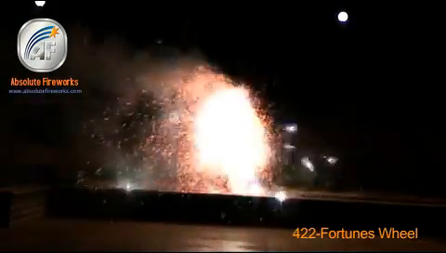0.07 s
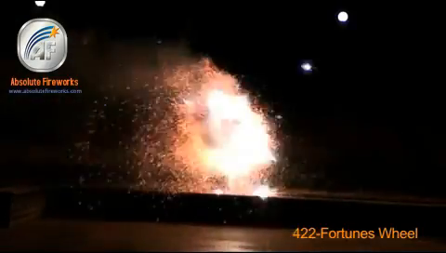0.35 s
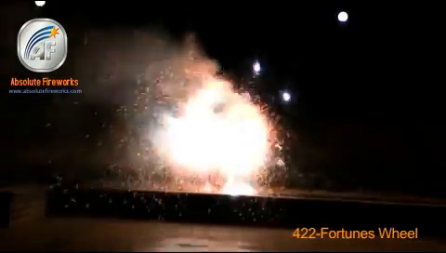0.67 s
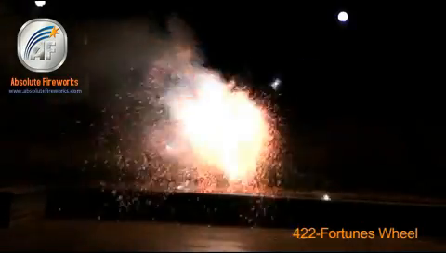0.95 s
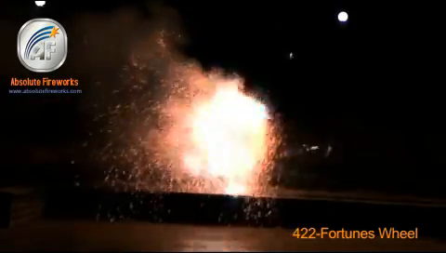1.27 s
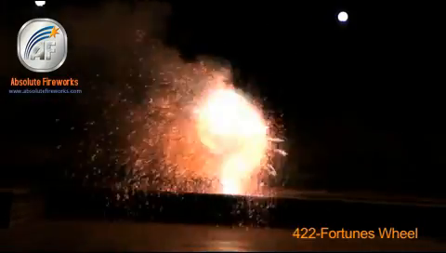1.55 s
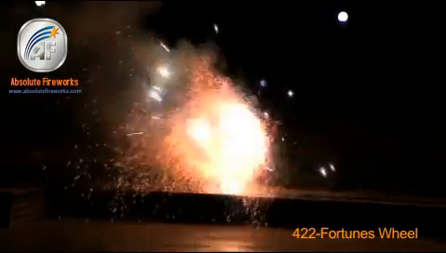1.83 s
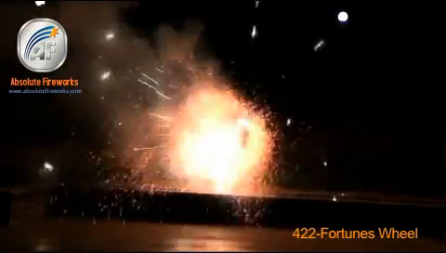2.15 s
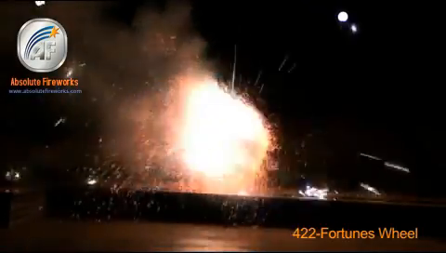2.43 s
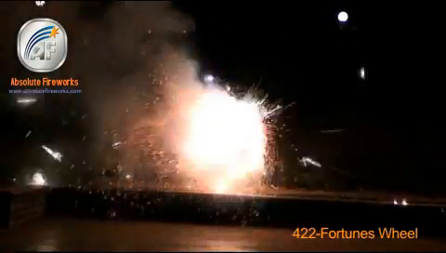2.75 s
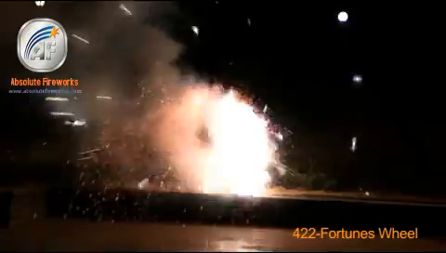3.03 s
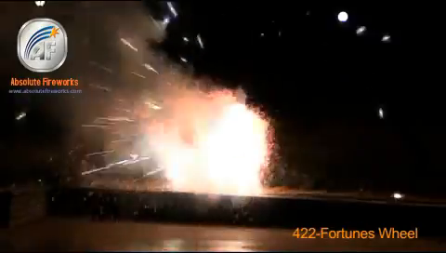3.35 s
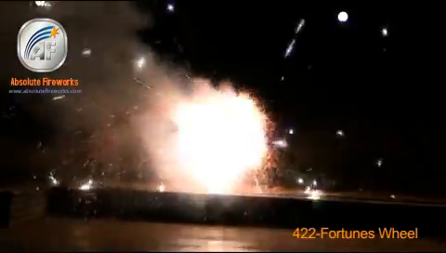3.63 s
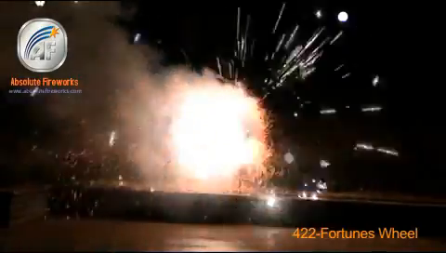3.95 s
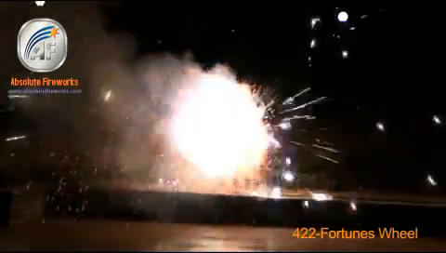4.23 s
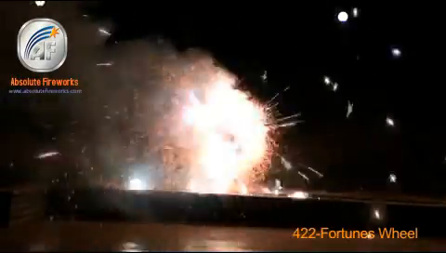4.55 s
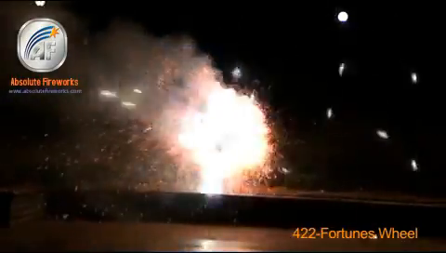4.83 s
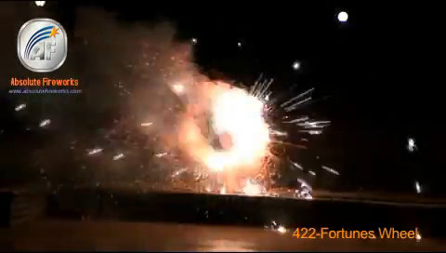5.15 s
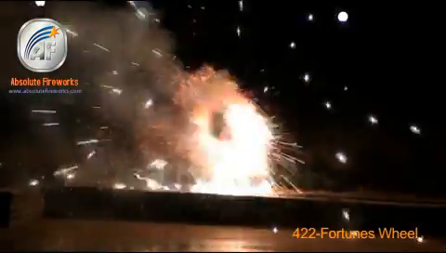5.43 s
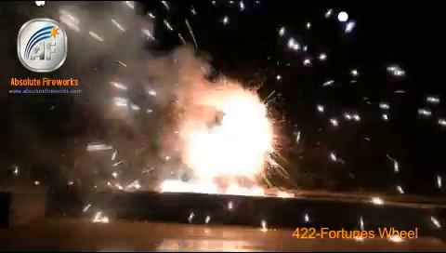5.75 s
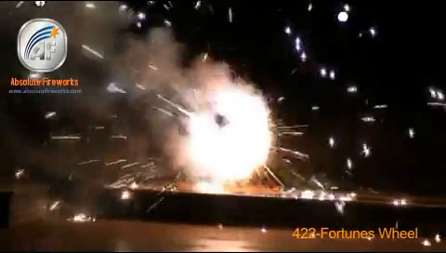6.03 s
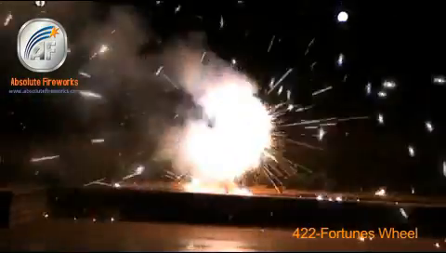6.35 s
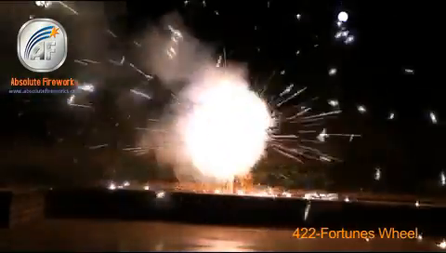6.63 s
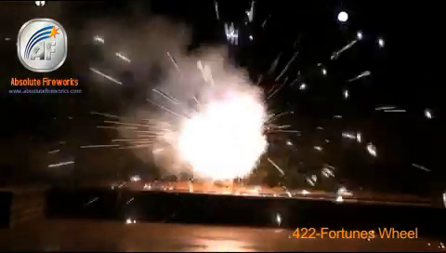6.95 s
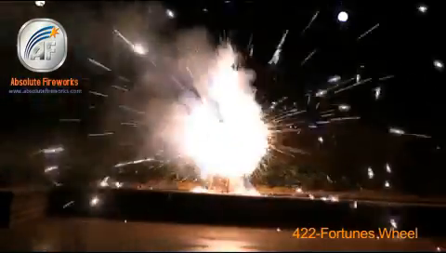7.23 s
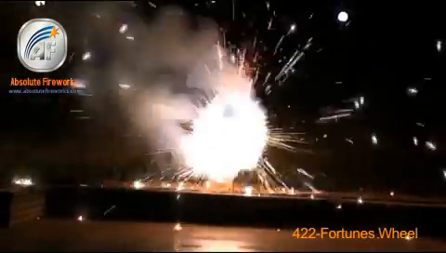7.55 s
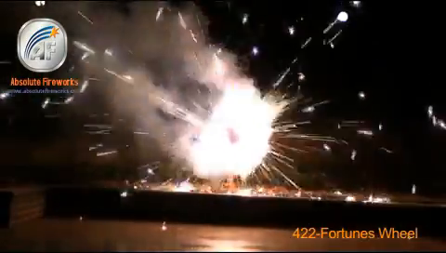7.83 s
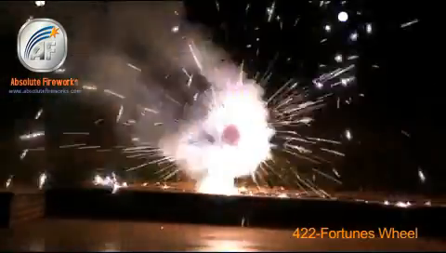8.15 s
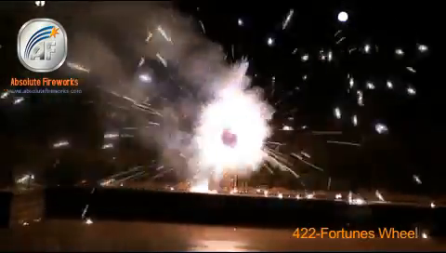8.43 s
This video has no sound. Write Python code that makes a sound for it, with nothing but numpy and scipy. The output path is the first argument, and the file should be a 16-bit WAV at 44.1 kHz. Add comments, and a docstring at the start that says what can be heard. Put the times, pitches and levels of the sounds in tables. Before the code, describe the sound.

Loud, sputtering hiss of a wheel firework outdoors, warbling up and down as it spins, over a rumbling flame and occasional low puffs.

```python
"""The jets of a wheel firework roar, hiss and throw sizzling sparks as it spins on its post outdoors.
Each nozzle rises and falls as the wheel turns, so its ground echo sweeps a comb through the hiss:
a warbling whistle. Later more jets light and the warble blurs. Underneath, the flame rumbles,
most strongly at first, and from about three seconds on the charges cough out a few low puffs."""
import sys
import numpy as np
from scipy import signal
from scipy.fft import rfft, irfft, next_fast_len
from scipy.io import wavfile
from scipy.ndimage import uniform_filter1d, map_coordinates

SR = 44100
rng = np.random.default_rng(int(sys.argv[2]) if len(sys.argv) > 2 else 0)


def store_wav(level_fs):
    """Save 16-bit WAV to argv[1]."""
    pcm = np.round(np.clip(np.atleast_2d(level_fs), -1, 1) * 32767)
    wavfile.write(sys.argv[1], SR, pcm.T.astype(np.int16))


N = 382788


# level ride of the gas flow (time [s], level [dB])
GAS_FLOW = [(0, -21.5), (.4, -20), (1.58, -22), (1.8, -19), (2.4, -20.5), (4.5, -21), (4.97, -18.5),
            (5.2, -22.5), (7.05, -23.5), (8.68, -21.5)]
# level ride of the flow of burning metal grains (time [s], level [dB])
SPARK_FLOW = [(0, -20.5), (.7, -20), (1.3, -20.5), (1.62, -18), (1.92, -14.5), (3.1, -14.5), (4.5, -14),
              (4.68, -16.5), (4.96, -18), (5.06, -13.5), (5.7, -13.5), (8.55, -14.3), (8.68, -17)]
# accents: spurts of sparks (centre time [s], sizzle boost [dB], length [s])
SPARK_SPURTS = [(.043, 5, 0.035), (.251, 5, 0.037), (.384, 5, 0.05), (.623, 3.5, 0.025), (.878, 5, 0.032),
                (1.015, 5.5, 0.025), (1.755, 3, 0.019), (1.898, 3.5, 0.041), (2.012, 3, .03),
                (3.171, 2.5, .05), (3.464, 3, 0.035), (3.578, 3, 0.032), (3.931, 3, 0.017),
                (4.13, 1.5, 0.034), (4.427, 1.5, 0.032), (4.547, 4.5, 0.017), (5.025, 3.3, 0.019),
                (5.477, 1.5, 0.023)]
# dips: the jet chokes for a moment (centre time [s], sizzle cut [dB])
JET_CHOKES = [(2.133, 3.5), (3.226, 4.5), (3.503, 4), (3.971, 5.5), (4.24, 2), (4.353, 5), (4.578, 5.5)]
# EQ of the midrange gas roar (frequency [Hz], relative level [dB])
ROAR_EQ = [(300, -30), (750, -12), (920, -4), (1060, -5.5), (1230, 2), (1420, -2), (1600, -4.5),
           (1830, -1.5), (2150, -6.5), (2600, -9), (3000, -12.5), (4000, -10.5), (8000, -80)]
# EQ of the bright hiss (frequency [Hz], relative level [dB])
HISS_EQ = [(1700, -30), (2300, -4), (2800, -5.5), (3100, -1), (3300, -1.5), (3650, -0.5), (4500, 0),
           (5350, -1.5), (5700, 1.5), (6100, -.5), (6600, -2), (8000, -5.5), (12000, -60)]
# EQ of the sparks' top-end sizzle (frequency [Hz], relative level [dB])
SIZZLE_EQ = [(3500, -36), (5500, -14), (6400, -7.5), (7100, -3.5), (8300, -1), (9600, -1), (10300, -4),
             (11200, -5.5), (12300, -11), (13500, -14.5), (15000, -17), (15600, -29)]

def jets(wheel, spark_share=0.51, roar_share=0.13, choke_s=0.028):
    """Gas roars, sparks sizzle and the hiss follows both; uneven burning shakes all three."""
    gas_db = automation(GAS_FLOW)
    strengths, _ = wheel
    unevenness = np.linalg.norm(strengths ** 2, axis=0)  # smaller when many jets share the work
    sputter = unevenness * 0.56 * wobble(45) + 0.92 * wobble(120)
    surge_db = swells(SPARK_SPURTS) - swells([(s, db, choke_s) for s, db in JET_CHOKES])
    spark_db = automation(SPARK_FLOW) + surge_db
    hiss_db = spark_share * spark_db + (1 - spark_share) * gas_db + 0.14
    roar_gain = amp(gas_db + roar_share * surge_db + 0.18 * sputter + .7 * wobble(30))
    roar = roar_gain * warbling_noise(wheel, ROAR_EQ, snap_share=0.039, patchy_db=1.16)
    hiss_gain = amp(hiss_db + 0.55 * sputter + 0.62 * wobble(45))
    hiss = hiss_gain * warbling_noise(wheel, HISS_EQ, snap_share=0.062, patchy_db=1.4)
    sizzle_gain = amp(spark_db + 1.38 * sputter + 0.35 * wobble(50))
    sizzle = sizzle_gain * warbling_noise(wheel, SIZZLE_EQ, snap_share=0.061, patchy_db=1.34)
    return roar + hiss + sizzle


# the wheel gathers speed (time [s], speed [turns/s])
WHEEL_SPEED = [(2.063, 2.552), (4.366, 2.849), (5.842, 3.226)]
# cues for the charges (place on rim [turns], fully alight [s], fade start [s], relative level [dB])
RIM_CHARGES = [(0, 0.5, 4.86, -0.5), (0.21, .5, 1.3, -2), (0.61, 0.6, 1.1, -2), (0.254, 5, 8.68, -0.5),
               (0.0054, 5.6, 8.68, -2), (.62, 5.85, 8.68, -2)]
# balance of the spread-out plume against all jets together (time [s], relative level [dB])
PLUME_BALANCE = [(0, -7), (1.3, -10), (2.1, -17), (5.4, -16), (6.2, -7)]

def nozzles(start_turn=.715, flicker_db=3, light_db_per_s=41, die_db_per_s=27):
    """Mix weights of the flickering jets and plume, and each jet's echo lag, longest at the top."""
    hub_ms, swing_ms, stray_ms = .622, .112, .012  # lag at hub height, wheel's swing, flame's drift
    t = np.arange(N) / SR
    turn = start_turn + np.cumsum(automation(WHEEL_SPEED)) / SR
    strengths, lags_ms = [], []
    for place, lit, spent, db in RIM_CHARGES:
        fade_db = light_db_per_s * np.maximum(lit - t, 0) + die_db_per_s * np.maximum(t - spent, 0)
        strengths.append(amp(db - fade_db + flicker_db * wobble(20)))
        lags_ms.append(hub_ms + swing_ms * np.cos(2 * np.pi * (turn + place)) + stray_ms * wobble(35))
    plume = amp(automation(PLUME_BALANCE)) * sum(strengths)
    strengths = np.array(strengths + [plume])
    return strengths / np.linalg.norm(strengths, axis=0), lags_ms


# tone of the echo: rough ground scatters the treble (frequency [Hz], echo over direct [ratio])
GROUND_ECHO = [(200, .35), (800, .4), (1400, .78), (2500, .88), (3600, .64), (5200, .48), (8000, .63),
               (13000, .58)]

def warbling_noise(wheel, eq, snap_share, patchy_db, waver_db=2):
    """Each jet flanges against its own ground echo; the plume is too wide to give a comb."""
    def equal_power_mix(hz):
        reflection = along(GROUND_ECHO, hz)
        return np.array([np.ones_like(hz), reflection]) / np.hypot(1, reflection)

    (*strengths, plume), lags_ms = wheel
    now = np.arange(N)
    voices = [strength * crackling(snap_share) for strength in strengths]
    echo = sum(np.interp(now - ms * SR / 1000, now, voice) for voice, ms in zip(voices, lags_ms))
    direct, echo = filtered(np.array([sum(voices), echo]), equal_power_mix)
    waver = amp(waver_db * wobble(28))  # the echo wavers in the hot air
    comb = direct + waver * echo
    comb /= np.sqrt(1 + np.var(echo) * (waver ** 2 - 1))  # hold the loudness steady
    return stereo_eq(eddies(comb + plume * crackling(snap_share), patchy_db), eq)


def crackling(snap_share, count=7000):
    """White noise with a share of its power in tiny snaps of bursting grains."""
    snaps = unit(np.bincount(rng.integers(0, N, count), rng.standard_normal(count), N))
    return np.sqrt(1 - snap_share) * white_noise() + np.sqrt(snap_share) * snaps


def eddies(noise, patchy_db):
    """Turbulent eddies brighten and dim patches of the spectrum for a few hundredths of a second."""
    spectrogram = signal.stft(noise, nperseg=256)[2]
    patches = uniform_filter1d(rng.standard_normal(spectrogram.shape), size=4, axis=0)
    patches = uniform_filter1d(patches, size=9, axis=1)
    return signal.istft(spectrogram * amp(patchy_db * unit(patches)), nperseg=256)[1][:N]


# level ride of the fireball (time [s], relative level [dB])
FIREBALL_LEVEL = [(0, -18.5), (.5, -17.5), (1.0, -18.5), (1.31, -15), (1.39, -19.5), (1.5, -17.5),
                  (1.85, -22.5), (2.0, -29.5), (2.5, -34), (3.3, -31.5), (4.6, -30), (5.02, -23),
                  (5.2, -33), (6.1, -41), (6.6, -37.5), (7.1, -45.5), (7.3, -39.5), (8.68, -37)]
# EQ of the bass rumble (frequency [Hz], relative level [dB])
RUMBLE_EQ = [(12, -37), (25, -10), (37, -7), (46, 2), (56, -4), (80, -3), (105, -7.5), (145, -8.5),
             (200, -12), (260, -19.5), (360, -19), (700, -62)]
# EQ of the low-mid flutter (frequency [Hz], relative level [dB])
FLUTTER_EQ = [(60, -13.5), (115, -4.5), (150, -0.5), (200, -5.5), (270, -10.5), (315, -3.5), (365, 0),
              (430, -2), (600, -2.8), (830, -4), (950, -4.5), (1200, -8.5), (2000, -41)]

def flame(wheel, flutter_follows=0.53):
    """The fireball rumbles and flutters in lumps; the flutter fades less than the rumble."""
    fireball_db = automation(FIREBALL_LEVEL)
    lumps_db = 1.4 * wobble(22)
    rumble = amp(fireball_db + .8 + lumps_db) * stereo_eq(white_noise(), RUMBLE_EQ)
    flutter_gain = amp(-14 + flutter_follows * fireball_db + lumps_db)
    flutter = flutter_gain * warbling_noise(wheel, FLUTTER_EQ, snap_share=0.02, patchy_db=1.1)
    return rumble + flutter


# cues for the coughs of the charges (time [s], relative peak level [dB])
PUFF_CUES = [(3.304, -15), (4.929, -15.5), (5.019, -18), (5.109, -21), (5.442, -19.5), (5.538, -14.5),
             (5.913, -18), (6.27, -16.5), (6.294, -20), (7.25, -22), (7.374, -14.5), (7.868, -14),
             (7.98, -19)]
# EQ of a dull puff (frequency [Hz], relative level [dB])
PUFF_EQ = [(25, -25), (70, -2), (145, -3.5), (200, -13), (265, -14), (350, -11), (500, -14), (700, -15.5),
           (1500, -32), (4000, -80)]

def puffs(attack_s=.0052, trim_db=-5.0):
    """The charges cough out low bursts of noise with a fast attack and a short tail."""
    envelope = np.zeros(N + SR)
    age = np.arange(SR // 4) / SR / attack_s
    for s, db in PUFF_CUES:
        start = round(s * SR)
        envelope[start:start + len(age)] += amp(db) * age * np.exp(1 - age)
    return amp(trim_db) * envelope[:N] * stereo_eq(white_noise(), PUFF_EQ)


# stereo width of every layer (frequency [Hz], side minus mid [dB])
STEREO_WIDTH = [(25, -15), (60, -6), (140, -6), (260, -10), (450, -43), (800, -42.5), (1400, -69),
                (3000, -38), (5000, -15), (10000, -12.5), (12000, -27)]

def stereo_eq(noise, eq):
    """Equalised noise in the middle and a little unrelated noise at the sides, at rms 1."""
    mid = filtered(noise, lambda hz: amp(along(eq, hz)))
    side = filtered(white_noise(), lambda hz: amp(along(eq, hz) + along(STEREO_WIDTH, hz)))
    return unit(np.array([mid + side, mid - side]))


def swells(events):
    """Bell-shaped level moves in dB, from (centre time [s], gain [dB], length at half height [s])."""
    t = np.arange(0, N, 32) / SR
    level = sum(db * .5 ** np.minimum((2 * (t - s) / length) ** 2, 20) for s, db, length in events)
    return np.interp(np.arange(N) / SR, t, level)


def wobble(rate):
    """Smooth random modulation, rate knots a second."""
    knots = rng.standard_normal(int(N * rate / SR) + 4)
    coarse = np.arange(0, N, 32)
    return np.interp(np.arange(N), coarse, map_coordinates(knots, [coarse * rate / SR]))


def automation(points):
    """Straight ramps through (time [s], value) points, one value per sample."""
    return np.interp(np.arange(N) / SR, *np.transpose(points))


def along(points, hz):
    """(frequency [Hz], value) points read on a log axis."""
    frequencies, values = np.transpose(points)
    return np.interp(np.log(hz + 1), np.log(frequencies + 1), values)


def filtered(x, response):
    """Zero-phase filter with gain response(hz)."""
    size = next_fast_len(N + 8192)
    return irfft(rfft(x, size) * response(np.fft.rfftfreq(size, 1 / SR)), size)[..., :N]


def white_noise():
    """The raw sound of turbulence."""
    return rng.standard_normal(N)


def amp(db):
    """Decibels to gain."""
    return 10 ** (np.asarray(db) / 20)


def unit(x):
    """Scaled to rms 1."""
    return x / np.sqrt(np.mean(x ** 2) + 1e-20)


def scene():
    """The burning wheel in the open air: jets up front, flame and puffs underneath."""
    wheel = nozzles()
    return jets(wheel) + flame(wheel) + puffs()


def record(dry, hardness=8, top_hz=15600):
    """A soft clipper rounds the highest peaks, then a brick-wall low-pass trims the top."""
    rounded = dry / (1 + np.abs(dry) ** hardness) ** (1 / hardness)
    return filtered(rounded, lambda hz: hz < top_hz)


dry = scene()
out = record(dry)
store_wav(out)
```